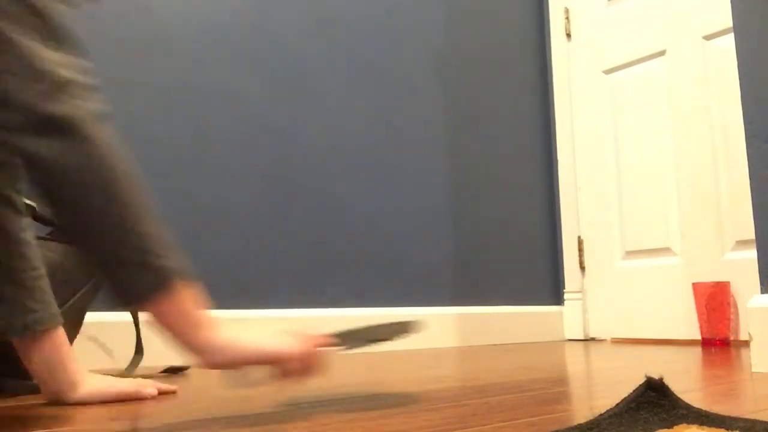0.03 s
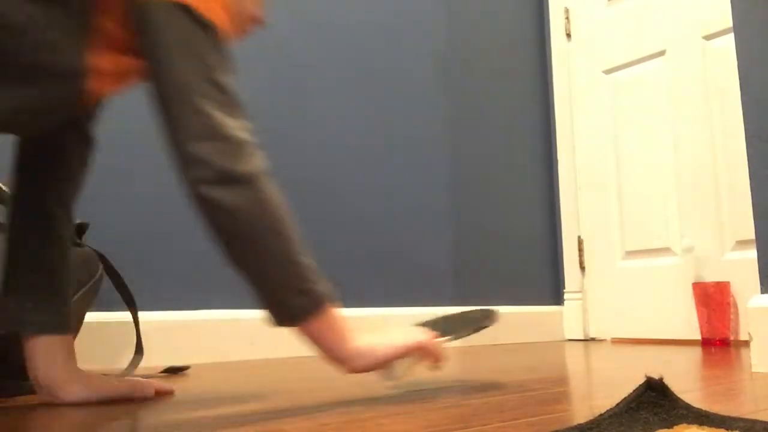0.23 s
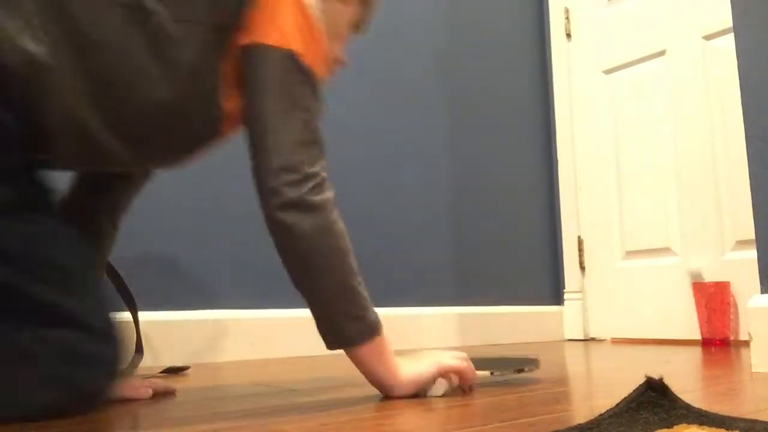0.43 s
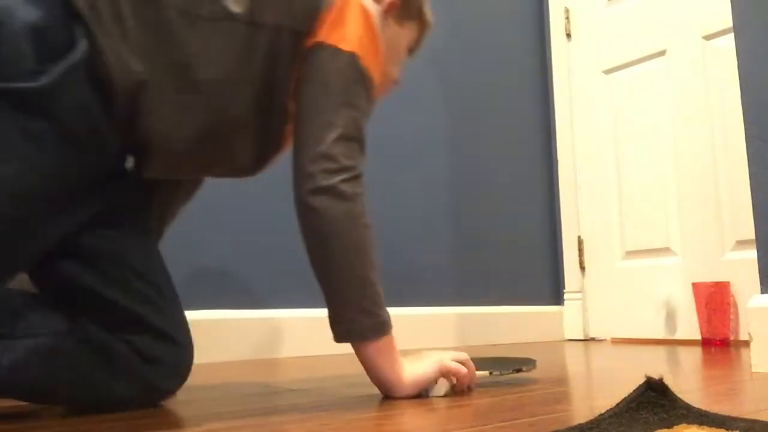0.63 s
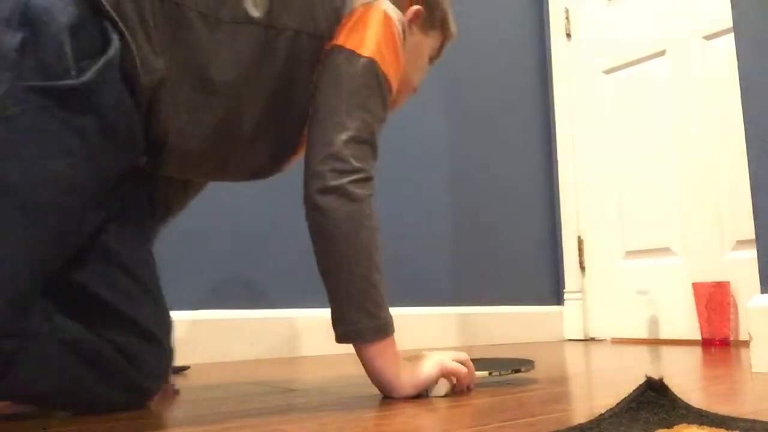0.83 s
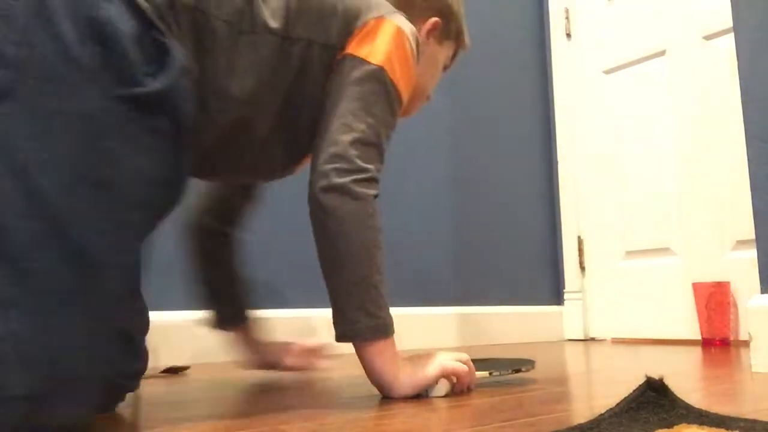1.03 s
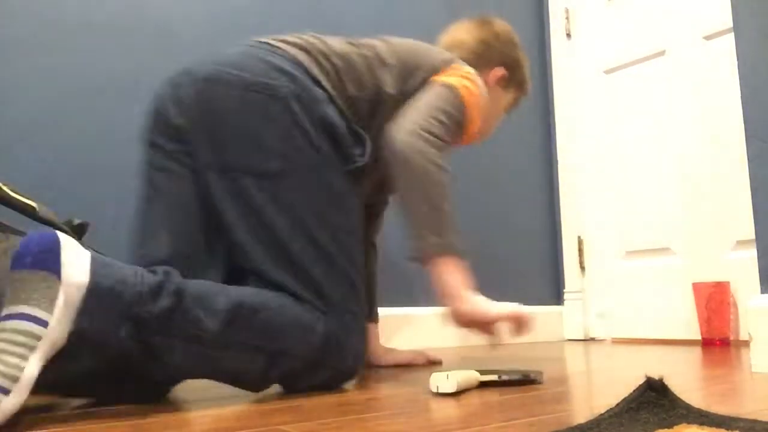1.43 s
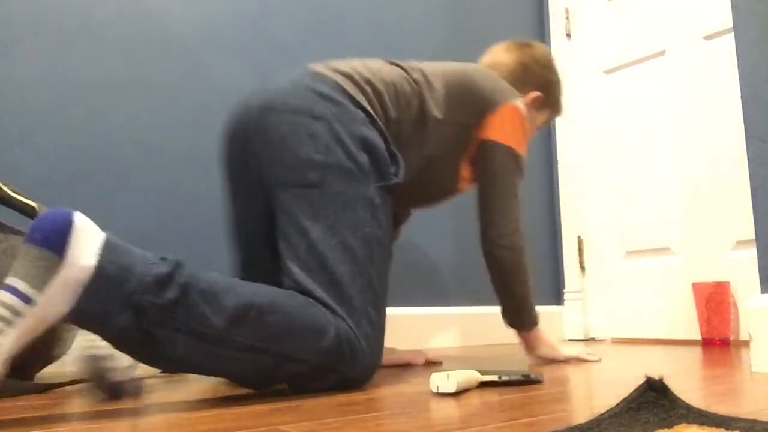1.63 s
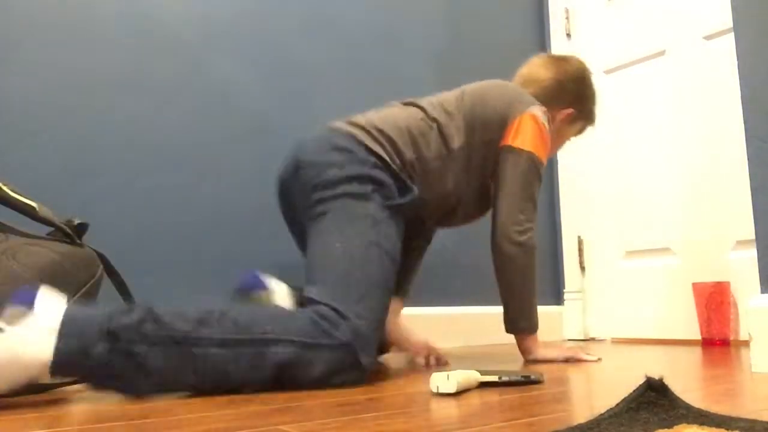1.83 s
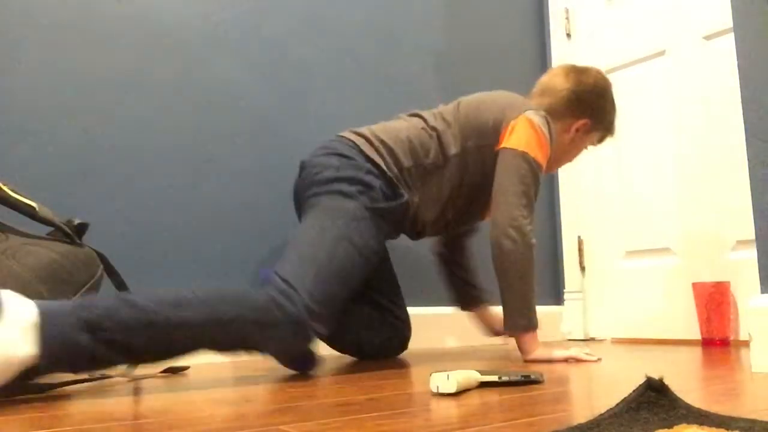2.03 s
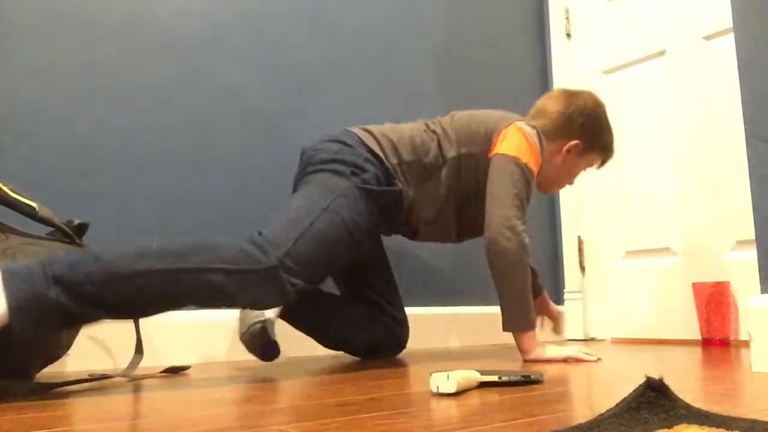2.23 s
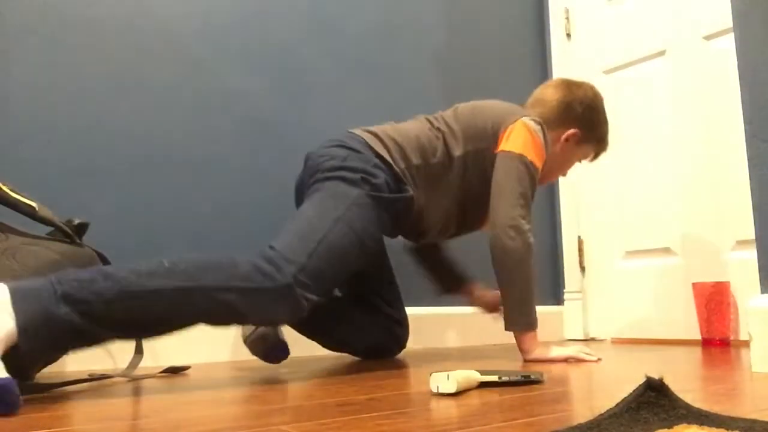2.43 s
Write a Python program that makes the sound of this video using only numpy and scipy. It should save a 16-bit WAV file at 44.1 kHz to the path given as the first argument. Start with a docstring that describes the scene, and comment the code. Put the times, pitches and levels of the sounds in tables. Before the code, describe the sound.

A table-tennis ball bounces on a wooden floor, ever quicker, as someone crawls after it.

```python
"""A table-tennis ball bounces away over a wooden floor in a small, hard room, from 0.1 s on.
Each bounce rings the thin shell and knocks the board under it; clothes rustle and tick throughout.
At 0.4 s a paddle is clapped down on the floor. From 1.25 s someone crawls after the ball,
hands and knees thudding, while the bounces come sooner and softer until the last at 2.3 s."""
import sys
import numpy as np
from scipy import signal
from scipy.fft import rfft, irfft
from scipy.io import wavfile
from scipy.ndimage import uniform_filter1d

SR = 44100
rng = np.random.default_rng(int(sys.argv[2]) if len(sys.argv) > 2 else 0)


def master_out(mix):
    """Clip the mix to full scale and print it as 16-bit PCM to the path in sys.argv[1]."""
    frames = np.transpose(np.atleast_2d(mix))
    ceiling = np.clip(frames, -1, 1)
    pcm = np.round(ceiling * 32767).astype(np.int16)
    wavfile.write(sys.argv[1], SR, pcm)


N = 110250
T = np.arange(N) / SR


def ball():
    """Each bounce clicks, rings the shell and knocks the board, from a new place in the room."""
    # (time [s], low, middle, high shell [dB], cutoff [Hz], knock [dB], board pitch [Hz], board [dB])
    bounces = [(0.1037, -57.5, -42.5, -39, 14000, -39.5, 560, -33.5),
               (0.4654, -63, -58, -49.5, 11800, -47, 545, -38),
               (.7603, -47.5, -38, -40.5, 13800, -40.5, 433, -42.5),
               (1.1028, -47, -41, -41, 11400, -43.5, 440, -50),
               (1.3935, -42.5, -48, -43, 12000, -44.5, 570, -49),
               (1.6459, -52, -46.5, -45, 12600, -48, 375, -57.5),
               (1.8663, -48.5, -49, -43, 11000, -44.5, 515, -59),
               (2.0590, -43, -48, -47.5, 9700, -43, 423, -51),
               (2.2208, -53.5, -52, -50.5, 11200, -55.5, 408, -49.5),
               (2.302, -66, -61, -60, 10600, -67, 287, -55)]
    # shell modes in three groups (frequency [Hz], relative level [dB], t60 [s])
    low_modes = [(6385, -5, 0.038), (6670, 5, 0.0058)]
    middle_modes = [(8196, -3, 0.015), (8700, -10.5, 0.01)]
    high_modes = [(9180, 2, 0.0078), (9910, 3, 0.029), (10450, 2.5, 0.004), (11360, -12.5, 0.013)]
    # contact spectra (frequency [Hz], gain [dB])
    click_spectrum = [(3000, -23), (5500, -23), (7000, -0.5), (9500, 16), (11000, -6.5), (12500, -9),
                      (16000, -20)]
    knock_spectrum = [(50, -20), (150, -10), (400, 1.5), (800, 1.5), (1300, -3.5), (2000, -15.5),
                      (2650, -7.5), (3050, -13), (3550, -6.5), (4600, -17.5), (8000, -25)]
    # board's hollow upper ring (frequency [Hz], level re knock [dB], t60 [s])
    hollow_modes = [(1078, -9.5, 0.013), (1337, -16.5, 0.07), (2722, -21.5, 0.005), (3425, -12.5, 0.0083)]
    # board modes (ratio to pitch, relative level [dB], t60 [s])
    board_modes = [(0.359, -12, 0.08), (.7, -10, 0.075), (1.021, 3.5, 0.043), (1.33, -11, 0.06)]
    board_lag_s = 0.0011
    out = np.zeros(N)
    for s, low_db, middle_db, high_db, top_hz, knock_db, board_hz, board_db in bounces:
        hit = np.zeros(N // 4)
        contact = burst(rise_s=0.002, fall_s=0.0017)
        ping = shell(low_modes, contact, low_db)
        ping += shell(middle_modes, contact, middle_db)
        ping += shell(high_modes, contact, high_db)
        click = blow(colour(contact, click_spectrum), high_db)
        add(hit, 0, lowpass(ping + click, top_hz))
        knock = blow(colour(burst(rise_s=0.0025, fall_s=0.0059), knock_spectrum), knock_db)
        hollow = amp(knock_db) * ring(hollow_modes, rise_s=0.0012)
        add(hit, 0, knock + hollow)
        modes = [(board_hz * ratio, db, t60) for ratio, db, t60 in board_modes]
        add(hit, board_lag_s, blow(ring(modes, rise_s=0.0015, sag=0.14), board_db))
        add(out, s, room(hit))
    return out


def shell(modes, contact, db, detune=0.004):
    """The contact rings a group of shell modes, a little differently as the ball turns."""
    out = 0
    for hz, mode_db, t60 in modes:
        detuned_hz = hz * (1 + detune * rng.standard_normal())
        mode = ring([(detuned_hz, 0, t60)], rise_s=0.0001)
        out += blow(signal.fftconvolve(contact, mode)[:len(mode)], mode_db)
    return blow(out, db)


def paddle(time_s=0.3952):
    """The wooden blade cracks against the floor and rings briefly."""
    # (frequency [Hz], relative level [dB], t60 [s])
    blade_modes = [(233, -6.5, 0.041), (598, -1, 0.021), (1040, 1.5, 0.049), (1170, -6.5, .045),
                   (1372, -2.5, 0.017), (1687, -1.5, 0.012), (2132, -3, .08), (2224, -7, 0.037),
                   (3530, -7, .015)]
    # (frequency [Hz], gain [dB])
    crack_spectrum = [(60, -27), (160, -11.5), (500, -10), (1200, 2), (2100, -7.5), (2700, -14.5),
                      (3500, -11.5), (5000, -23), (10000, -36), (16000, -38)]
    blade = blow(ring(blade_modes, rise_s=0.0012), db=-36)
    crack = blow(colour(burst(rise_s=0.00018, fall_s=0.0019), crack_spectrum), db=-35.5)
    out = np.zeros(N)
    add(out, time_s, blade + crack)
    return out


def crawling():
    """Hands and knees thump the boards, with a soft slap."""
    # (time [s], pitch [Hz], thump [dB], slap [dB])
    thuds = [(0.2434, 152.2, -41, -55), (1.254, 237, -60, -56), (1.305, 160, -51, -62),
             (1.3111, 215, -69, -51.5), (1.3424, 200, -54, -45.5), (1.3507, 294, -44.5, -53),
             (1.3541, 176, -44.5, -52), (1.376, 252, -52.5, -52.5), (1.684, 290, -55.5, -51.5),
             (1.763, 142, -52, -76), (1.782, 186, -61, -82), (2.19, 259, -54.5, -60),
             (2.2235, 253.4, -53.5, -54.5), (2.246, 395, -61, -66)]
    # floor under a soft blow (ratio to pitch, relative level [dB], t60 [s])
    floor_modes = [(.72, -31, .04), (1.001, 8.5, 0.032), (1.6, -3.5, 0.031)]
    # (frequency [Hz], gain [dB])
    slap_spectrum = [(50, -3), (200, -5.5), (400, 3), (800, 1.5), (1400, -23.5), (2800, -13.5), (5000, -20),
                     (12000, -28)]
    out = np.zeros(N)
    for s, hz, thump_db, slap_db in thuds:
        thump = ring([(hz * ratio, db, t60) for ratio, db, t60 in floor_modes], rise_s=0.0071)
        slap = colour(burst(rise_s=0.0022, fall_s=0.0016), slap_spectrum)
        add(out, s, blow(thump, thump_db) + blow(slap, slap_db))
    return out


def ticks(room_send=0.4, skirt_db=-20):
    """Clothing and fingers tick close by, with little room sound."""
    # (time [s], level [dB], centre [Hz])
    tick_events = [(0.0246, -60.5, 1030), (0.3156, -56.5, 3320), (1.179, -53, 8100), (1.2573, -57, 3330),
                   (1.31, -58.5, 2020), (1.351, -54, 2340), (1.6276, -59, 2050), (1.7816, -51, 4740),
                   (.571, -61, 3960), (0.9195, -69, 7900)]
    out = np.zeros(N)
    for s, db, hz in tick_events:
        hump = [(hz / 4, skirt_db), (hz / 1.35, 0), (hz * 1.04, 0), (hz * 4, skirt_db)]
        add(out, s, blow(colour(burst(rise_s=0.000305, fall_s=0.00078), hump), db))
    return (1 - room_send) * out + room_send * room(out)


def clothes(grain_hz=243, grain_db=1.5):
    """Fabric rubs: grainy noise that swells with the movement."""
    # (time [s], level [dB])
    rub_levels = [(0, -71), (.1, -71), (.28, -63), (.42, -61), (.56, -61.5), (.7, -71.5), (.85, -64),
                  (.95, -65), (1.079, -67), (1.2, -62.5), (1.359, -64.5), (1.5, -64.5), (1.6, -68.5),
                  (1.72, -68), (1.8, -60), (2.02, -69.5), (2.13, -71), (2.19, -63), (2.28, -76),
                  (2.37, -82.5), (2.5, -71)]
    # (frequency [Hz], gain [dB])
    cloth_spectrum = [(100, -12), (240, 6), (500, -2), (1200, -2.5), (2200, -6.5), (3800, 3), (6000, -5),
                      (9500, 0.5), (12000, -10), (16000, -21.5)]
    rub = colour(rng.standard_normal(N), cloth_spectrum)
    hold = int(SR / grain_hz)
    steps = np.repeat(rng.standard_normal(N)[:N // hold + 1], hold)
    grain = uniform_filter1d(steps, hold)[:N]
    s, db = np.array(rub_levels).T
    return rub / rub.std() * amp(np.interp(T, s, db) + grain_db * grain)


def swishes(skirt_db=-43.5):
    """Trousers slide over the boards in brief swells of hiss."""
    # (peak time [s], 1/e half-width [s], level [dB], centre [Hz])
    slides = [(0.32, 0.048, -73, 4550), (.96, .08, -71, 11500), (1.326, 0.034, -60.5, 1400),
              (1.492, 0.07, -66, 3520), (1.778, 0.01, -65, 4400), (2.182, 0.012, -57, 4000)]
    out = np.zeros(N)
    for s, width_s, db, hz in slides:
        hiss = colour(rng.standard_normal(N), [(hz / 4, skirt_db), (hz, 0), (hz * 4, skirt_db)])
        out += hiss / hiss.std() * amp(db) * np.exp(-((T - s) / width_s) ** 2)
    return out


def room(x, tail_db=-4.5, early_db=-6.5, build_s=0.0097, size=24576, bands=12):
    """Direct sound plus the walls' distinct echoes, scattered echoes and diffuse tail."""
    # (delay [s], level [dB])
    echoes = [(.0093, -8.5), (0.0237, -11.5)]
    # tail decay (frequency [Hz], t60 [s])
    decay_times = [(100, 0.37), (500, 0.3), (1400, 0.34), (3600, 0.28), (9000, 0.27), (15000, 0.17)]
    # (frequency [Hz], gain [dB])
    reverb_spectrum = [(60, -6.5), (180, 0.5), (500, -0.5), (1200, 1.5), (3500, -0.5), (9000, -3),
                       (16000, 6)]
    t, hz = T[:size], np.fft.rfftfreq(size, 1 / SR)
    noise = rfft(rng.standard_normal(size))
    centres_hz = np.geomspace(60, 16000, bands)
    tail = 0
    for centre_hz, weights in zip(centres_hz, np.eye(bands)):
        band = irfft(noise * along(list(zip(centres_hz, weights)), hz))
        tail += band * np.exp(-np.log(1000) * t / along(decay_times, centre_hz))
    tail *= 1 - np.exp(-(t / build_s) ** 2)
    early = burst(build_s, fall_s=0.022, size=size)
    reverb = amp(tail_db) * tail / np.linalg.norm(tail) + amp(early_db) * early / np.linalg.norm(early)
    response = colour(reverb, reverb_spectrum)
    response[0] += 1  # direct path
    for s, db in echoes:
        echo = burst(rise_s=0.00028, fall_s=0.00035, size=256)
        add(response, s, amp(db) * echo / np.linalg.norm(echo))
    return signal.fftconvolve(x, response)[:len(x)]


def air(level_db=-67):
    """Faint steady rumble of the still room."""
    # (frequency [Hz], gain [dB])
    air_spectrum = [(20, 9), (40, -6), (60, -0.5), (120, 1), (250, -12.5), (600, -19), (2000, -22),
                    (6000, -30.5), (10000, -28), (16000, -26)]
    rumble = colour(rng.standard_normal(N), air_spectrum)
    return amp(level_db) * rumble / rumble.std()


def burst(rise_s, fall_s, size=8192):
    """Noise puff with an even spectrum: linear rise, exponential fall."""
    t = T[:size]
    envelope = np.minimum(t / rise_s, 1) * np.exp(-np.maximum(t - rise_s, 0) / fall_s)
    puff = rng.standard_normal(size) * envelope
    white = irfft(np.exp(1j * np.angle(rfft(puff))))
    local_rms = np.sqrt(np.abs(uniform_filter1d(white ** 2, size=32)) + 1e-12)
    return white * envelope / local_rms


def ring(modes, rise_s, sag=0, sag_s=0.029, size=8192):
    """Damped sines (frequency [Hz], level [dB], t60 [s]); pitch sinks by the fraction sag."""
    t = T[:size]
    swell = 1 - np.exp(-t / rise_s)
    clock = t - sag * (t - sag_s * (1 - np.exp(-t / sag_s)))
    out = 0
    for hz, db, t60 in modes:
        tone = np.sin(2 * np.pi * (hz * clock + rng.random()))
        out += blow(tone * swell * np.exp(-np.log(1000) * t / t60), db)
    return out


def colour(x, points, size=4096):
    """Minimum-phase filter from (frequency [Hz], gain [dB]) points."""
    gain = amp(along(points, np.fft.rfftfreq(size, 1 / SR)))
    cepstrum = irfft(np.log(gain))
    cepstrum[1:size // 2] *= 2
    cepstrum[size // 2 + 1:] = 0
    response = irfft(np.exp(rfft(cepstrum)))
    return signal.fftconvolve(x, response)[:len(x)]


def lowpass(x, hz):
    """Fourth-order roll-off."""
    return signal.sosfilt(signal.butter(4, hz, fs=SR, output="sos"), x)


def along(points, hz):
    """Interpolate a table over log frequency."""
    knots_hz, values = np.array(points, float).T
    return np.interp(np.log(np.maximum(hz, 1)), np.log(knots_hz), values)


def blow(x, db):
    """Scale a short sound to the energy of 10 ms at this level."""
    return x * amp(db) * np.sqrt(0.01 * SR / np.sum(x ** 2))


def add(track, s, sound):
    """Mix a sound into the track at time s."""
    start = int(s * SR)
    track[start:start + len(sound)] += sound[:N - start]


def amp(db):
    """Decibels to amplitude."""
    return 10 ** (np.asarray(db) / 20)


def scene(thud_send=0.66):
    """All sources in the room, over its rumble; the thuds are close and drier."""
    rumble, thuds = air(), crawling()
    body = (1 - thud_send) * thuds + room(thud_send * thuds + clothes() + swishes()) + ticks()
    return (ball() + room(paddle()) + body + rumble)[None]


def record(dry, low_hz=70, top_hz=16000):
    """The phone thins the deep bass and cuts the top."""
    thin = signal.sosfilt(signal.butter(2, low_hz, "high", fs=SR, output="sos"), dry)
    return signal.sosfilt(signal.ellip(10, 0.2, 70, top_hz, fs=SR, output="sos"), thin)


dry = scene()
out = record(dry)
master_out(out)
```